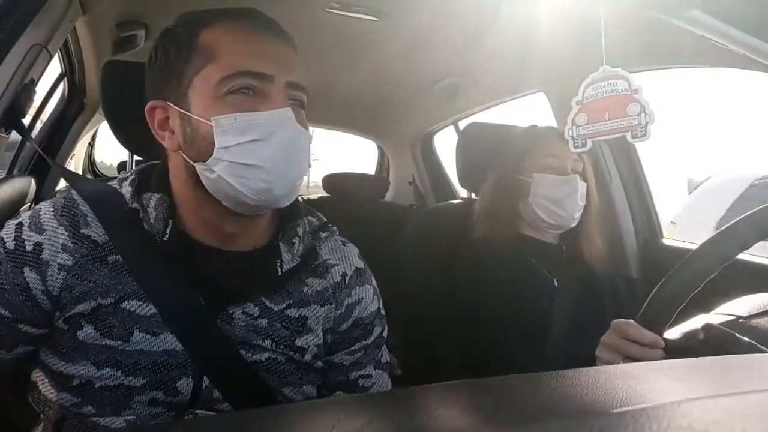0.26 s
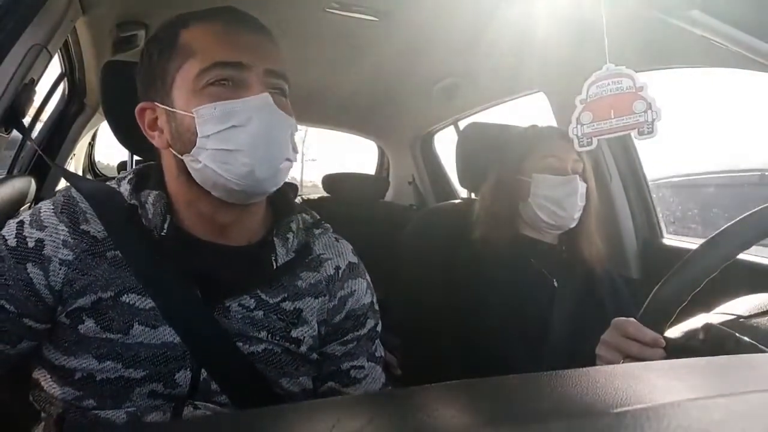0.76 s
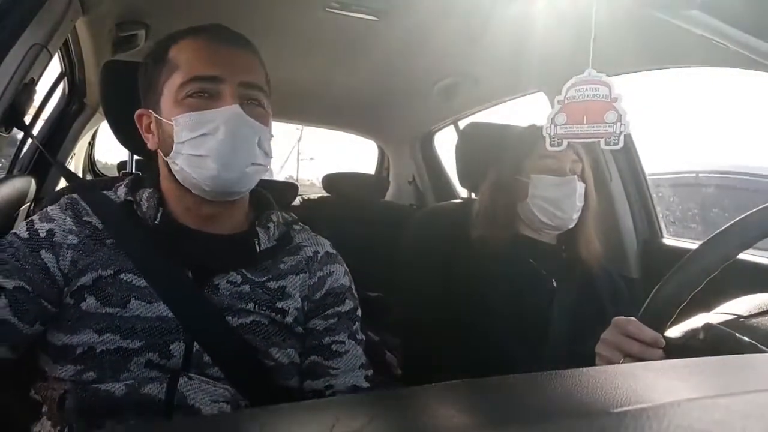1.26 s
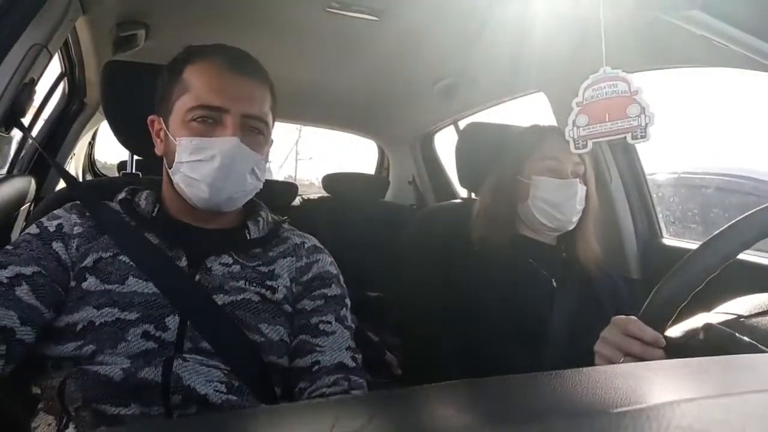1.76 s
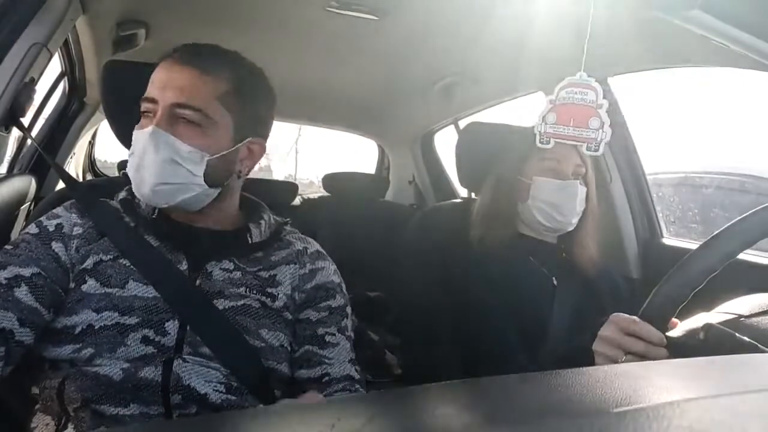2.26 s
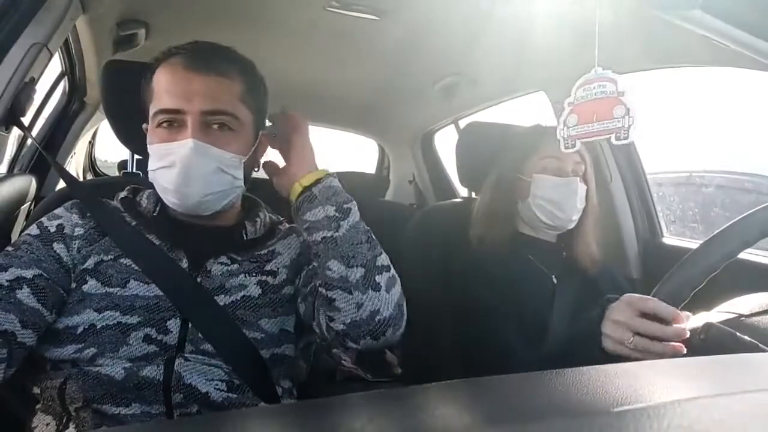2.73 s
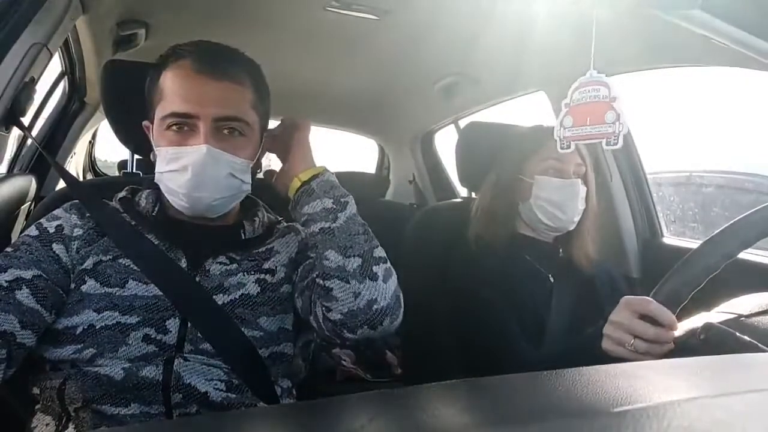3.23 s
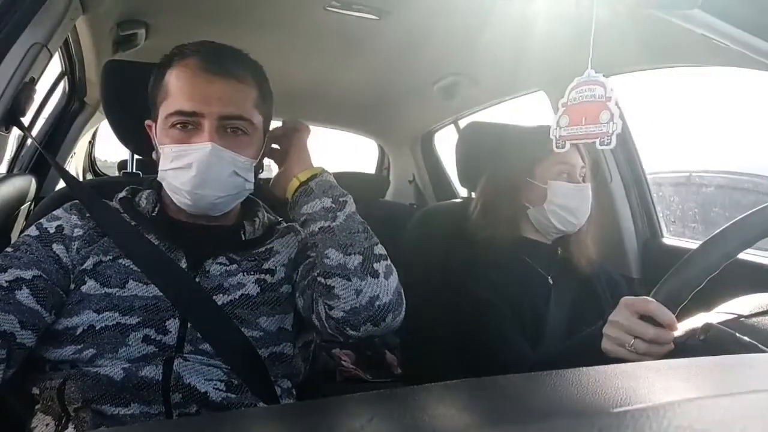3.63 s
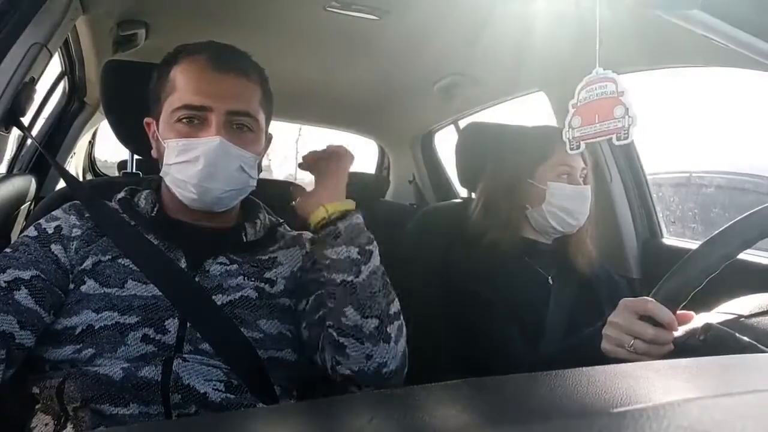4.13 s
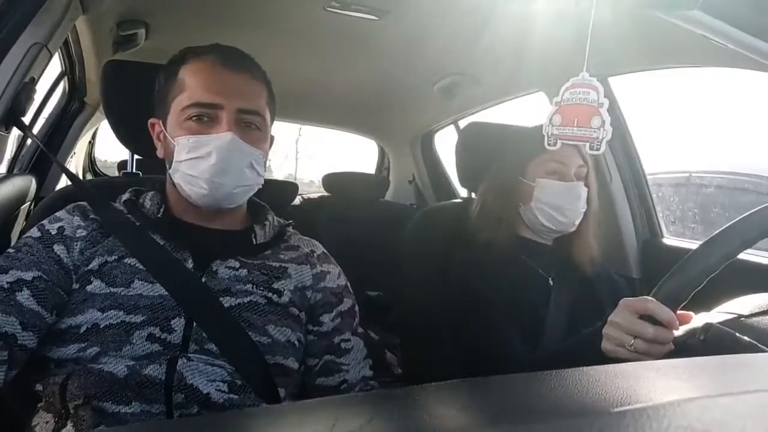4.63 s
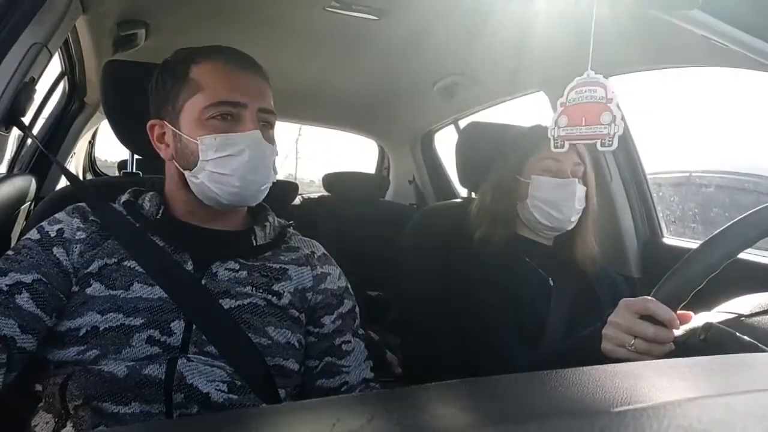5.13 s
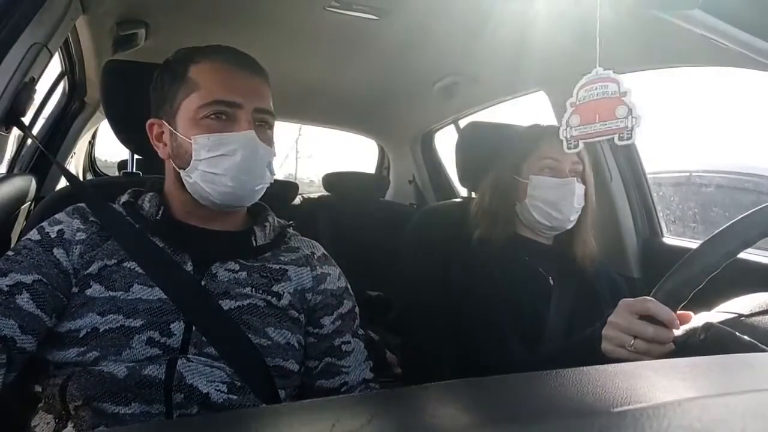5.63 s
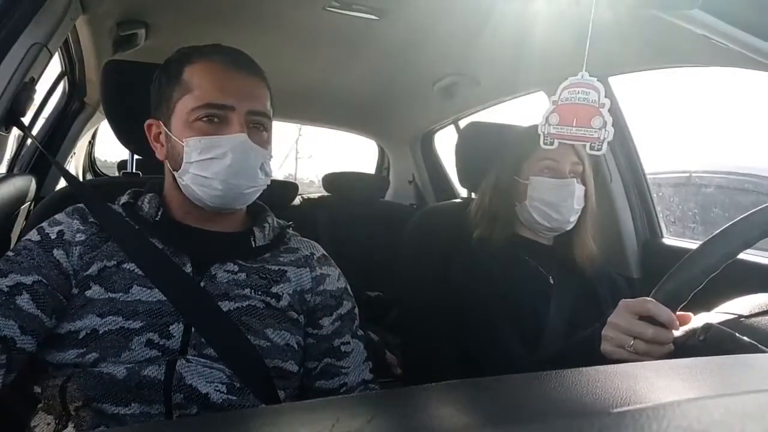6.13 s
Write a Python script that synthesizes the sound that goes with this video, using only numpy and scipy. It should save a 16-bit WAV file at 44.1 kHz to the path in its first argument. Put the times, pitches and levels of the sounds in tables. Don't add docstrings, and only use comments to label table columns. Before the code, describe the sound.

A low, boomy car interior in close stereo. The road rumble starts strongest and sinks in lumps over two seconds, ending in shudders, creaks and thin brake squeaks. Then a steady muffled idle drums the cabin with faint vent air. Cloth rubs near the microphone, followed by one tiny squeak, a small plastic click to the left and a short low lorry boom beyond the doors.

```python
import sys
import numpy as np
from scipy import signal
from scipy.fft import rfft, irfft, next_fast_len
from scipy.io import wavfile

SR = 44100
rng = np.random.default_rng(int(sys.argv[2]) if len(sys.argv) > 2 else 0)


def undo_db(level):
    steps = np.asarray(level, float) / 20
    return 10 ** steps


def put_to_file(sound):
    columns = np.atleast_2d(sound).T
    safe = np.clip(columns, -1, 1)
    whole_steps = np.round(safe * 32767)
    wavfile.write(sys.argv[1], SR, whole_steps.astype(np.int16))


N = 281799
TIME = np.arange(N) / SR


def rms_one(x):
    return x / np.sqrt(np.mean(x ** 2) + 1e-20)


def in_time(rows):
    s, value = np.transpose(rows)
    return np.interp(TIME, s, value)


def at_hz(points, hz):
    table_hz, value = np.transpose(points)
    return np.interp(np.log(hz + 1), np.log(table_hz + 1), value)


def drift(rate):
    r = np.exp(-80 * np.pi * rate / SR)
    slow = signal.lfilter([1], [1, -2 * r, r * r], rng.standard_normal(N // 40 + 4002))[4000:]
    return np.interp(np.arange(N) / 40, np.arange(len(slow)), rms_one(slow))


def swell(start_s, length_s, edge_s):
    half, end_s = edge_s / 2, start_s + length_s
    rise = np.interp(TIME, [start_s - half, start_s + half], [0, 1])
    fall = np.interp(TIME, [end_s - half, end_s + half], [1, 0])
    share = rise * fall
    return share * share * (3 - 2 * share)


def resonance(x, hz, width_hz):
    r = np.exp(-np.pi * width_hz / SR)
    poles = [1, -2 * r * np.cos(2 * np.pi * hz / SR), r * r]
    return signal.lfilter([(1 - r * r) / 2, 0, (r * r - 1) / 2], poles, x)


def ring(clicks, hz, t60_s):
    r, w = undo_db(-60 / (t60_s * SR)), 2 * np.pi * hz / SR
    return signal.lfilter([0, np.sin(w)], [1, -2 * r * np.cos(w), r * r], clicks + 1e-18)


def dull(x, hz):
    return signal.sosfilt(signal.butter(2, hz, fs=SR, output="sos"), x)


# pitch_hz, side_minus_mid_db
STEREO_WIDTH = [(200, -16), (330, -11.5), (390, -5.5), (450, -10.5), (600, -3), (690, 5.5), (820, 9),
                (950, 2.5), (1250, -1.5), (1700, 2), (2400, -2), (5800, 1.5), (6300, -9), (15000, -11)]
# pitch_hz, left_minus_right_db
LEFT_LEAN = [(60, 0.5), (110, 2.5), (200, 0.5), (380, 0.0), (700, 0), (1290, 2), (2380, 2), (4400, -1.5),
             (8120, 2), (15000, 0.0)]
# pitch_hz, share
QUARTER_LEAD = [(150, 0), (350, -.3), (650, -.1), (950, .3), (1350, .3), (1700, .1), (2250, .25), (3000, 0)]


def noise(spectrum, lo_hz=10, hi_hz=20000):
    size = next_fast_len(N)
    hz = np.fft.rfftfreq(size, 1 / SR)
    mid, side = rfft(rng.standard_normal((2, size))) * undo_db(at_hz(spectrum, hz))
    lead = np.clip(at_hz(QUARTER_LEAD, hz), -.9, .9)
    side = (np.sqrt(1 - lead ** 2) * side + 1j * lead * mid) * undo_db(at_hz(STEREO_WIDTH, hz))
    lean = undo_db(at_hz(LEFT_LEAN, hz) / 2)
    in_band = (hz > lo_hz) & (hz < hi_hz)
    scale = np.sqrt(2 * np.sum(np.abs(mid[in_band]) ** 2)) / size
    return irfft([(mid + side) * lean, (mid - side) / lean], size)[:, :N] / scale


# pitch_hz, level_db (per Hz)
FLOOR_BOOM = [(15, -50), (25, -51), (68, -2), (91, 3.5), (167, -1.5), (204, -18.5), (249, -3), (313, -26.5),
              (350, -43), (460, -45), (770, -120)]
# pitch_hz, level_db (per Hz)
TYRE_DRONE = [(88, -30), (150, 2), (205, -4), (304, -6), (352, -15), (411, -6.5), (586, -34), (663, -40.5),
              (1290, -36), (1800, -48), (2340, -65), (3960, -120)]
# start_s, speed_kmh
ROLLING_SPEED = [(0, 23.6), (.45, 16.1), (.75, 14.1), (1.05, 9), (1.5, 8.1), (2.1, 3.3), (2.4, 3)]
# start_s, length_s, boom_gain_db, drone_gain_db
BRAKING_SHUDDERS = [
    (0.371, .1, 6, 0.5),
    (1.425, 0.15, -4, 2),
    (1.688, 0.25, 7.5, 2.5),
    (2.04, 0.122, 13, 2.5),
    (2.167, .25, 13, 1.5),
]


def road():
    full_kmh, edge_s = 20, 0.025
    decades = np.log10(np.maximum(in_time(ROLLING_SPEED), .1) / full_kmh)
    boom_db = -29 + 37.5 * decades + 0.3 * drift(3.2)
    drone_db = -36 + 9.5 * decades + 0.91 * drift(21)
    for start_s, length_s, boom_gain_db, drone_gain_db in BRAKING_SHUDDERS:
        shudder = swell(start_s, length_s, edge_s)
        boom_db = boom_db + boom_gain_db * shudder
        drone_db = drone_db + drone_gain_db * shudder
    boom = undo_db(boom_db) * noise(FLOOR_BOOM, 50, 205)
    drone = undo_db(drone_db) * noise(TYRE_DRONE, 163, 410)
    stop = np.clip((2.4 - TIME) / 0.24, 0, 1)
    return stop * (boom + drone)


FIRING_HZ = 22.07
# start_s, level_db
ENGINE_LOAD = [(0, -8), (2.0, -9), (2.6, -1.5), (3.0, -0.5), (4.0, -2), (4.5, 0), (6.39, -1.5)]
# firing_multiple, level_db
ENGINE_ORDERS = [(1, -48), (2, -16), (3, -7.5), (4, -19), (5, -4), (6, 1), (7, -2), (8, -13), (9, -1.5),
                 (10, 2.5), (11, -19), (12, -7.5), (13, -1), (14, -4.5), (15, -21), (16, -12), (17, -10),
                 (18, -10), (19, -8.5), (20, -9.5), (21, -20), (22, -10.5), (23, -17.5), (24, -14.5)]
# firing_multiple, start_s, length_s, level_db
PANEL_SPELLS = [(4, 2.4, 1.9, -50.5), (4, 4.93, 0.62, -48), (5, 2.18, 1.93, -47.5), (5, 4.6, 1.9, -53),
                (6, 2.1, 1.14, -46), (6, 3.64, 0.985, -43.5), (6, 4.6, 1.9, -50.5), (9, 2.4, 0.5, -50),
                (9, 3.48, 1.08, -51.5), (10, 2.45, 1.2, -48), (10, 3.95, 0.41, -52), (10, 5.2, 1.3, -44.5)]


def engine_orders():
    others_db = -50.5 + .4 * in_time(ENGINE_LOAD)
    out_of_tune_db, edge_s = -57, 0.14
    strong_db = {}
    for k, start_s, length_s, db in PANEL_SPELLS:
        tuned_db = out_of_tune_db + (db - out_of_tune_db) * swell(start_s, length_s, edge_s)
        strong_db[round(k)] = np.maximum(strong_db.get(round(k), tuned_db), tuned_db)
    out = np.zeros((2, N))
    for k, order_db in ENGINE_ORDERS:
        level_db = strong_db.get(int(k), others_db + order_db + 1.56 * drift(0.86))
        wander = 0.25 * np.sqrt(k) * drift(0.62)
        phase = 2 * np.pi * k * FIRING_HZ * TIME + rng.uniform(0, 2 * np.pi) + wander
        skew = undo_db(at_hz(STEREO_WIDTH, k * FIRING_HZ)) * np.array([[-1], [1]])
        out += undo_db(level_db) * np.sqrt(2) * np.sin(phase + skew)
    return out


# pitch_hz, width_hz, level_db, delay_s, side_minus_mid_db
BLOCK_MODES = [(560, 90, 3.5, .010, -10), (719, 24, -3.5, .006, 9), (810, 59, -13, .004, 13),
               (902, 27, 4, 0.00079, -0.5), (970, 250, -6, 0.012, 4.5), (1213, 56, -7, 0.00049, -9),
               (1279, 47, -3, .008, -6.5), (1580, 32, -5.5, 0.00224, -3), (2306, 34, -9.5, 0.018, -11)]


def engine_knock():
    knock_db = -68.5 + in_time(ENGINE_LOAD)
    turns = FIRING_HZ * TIME
    out = np.zeros((2, N))
    for hz, width_hz, mode_db, delay_s, side_db in BLOCK_MODES:
        strength = undo_db(1.1 * rng.standard_normal(int(turns[-1]) + 3))
        late = turns + 1 + .19 - delay_s * FIRING_HZ
        since_s = (late % 1) / FIRING_HZ
        blow = since_s < 1 / SR
        rattle = (.035 * np.exp(-since_s / .009) + .008) * rng.standard_normal((2, N))
        push = strength[late.astype(int)] * (blow + rattle)
        mid, side = rms_one(dull(resonance(push, hz, width_hz), 2 * hz))
        side = undo_db(side_db) * np.roll(side, -round(SR / hz / 4))
        out += undo_db(knock_db + mode_db) * np.array([mid + side, mid - side])
    return out


# pitch_hz, level_db (per Hz)
CABIN_DRUMMING = [(20, -37), (40, -36.5), (65, -8.5), (95, -3), (180, -6.5), (240, -5.5), (310, -6),
                  (350, -10.5), (430, -9.5), (520, -13), (610, -15.5), (680, -28.5), (800, -34.5),
                  (1000, -65.5)]


def cabin():
    level_db = -51.5 + 2 * swell(-1.04, 3.2, 0.081) + 1.0 * drift(7.6)
    return undo_db(level_db) * noise(CABIN_DRUMMING, 444, 920)


# pitch_hz, level_db (per Hz)
VENT_AIR = [(500, -25.5), (700, -7.5), (900, 1.5), (1300, -1.5), (1500, -6), (1800, -9), (2300, -9.5),
            (2600, -16), (3400, -13), (4600, -16), (4900, -44)]


def blower():
    rush_db = 2.5 * swell(-1, 2.1, .8)
    return undo_db(-62.5 + rush_db + 0.97 * drift(6.6)) * noise(VENT_AIR)


# pitch_hz, level_db (per Hz)
MICROPHONE_HISS = [(4000, -40.5), (4700, 9), (6000, 3), (6200, 9.5), (7600, 4.5), (7750, -35), (8450, 9),
                   (8650, -16), (11300, -24), (11600, 6), (12800, 9.5), (13100, 11.5), (15700, 13),
                   (15780, -62)]


def microphone_hiss():
    return undo_db(-74.5 + .6 * drift(12)) * noise(MICROPHONE_HISS)


# pitch_hz, level_db (per Hz)
CLOTH_RUB = [(1200, -29), (2200, 0), (3300, 0.5), (4600, 2), (4900, -9), (6000, -8.5), (6300, 2.5),
             (7600, 1.5), (8450, -4.5), (8650, -12.5), (11300, -30.5), (11700, -8.5), (15700, -7.5),
             (15780, -54)]
# start_s, length_s, level_db
ARM_GESTURES = [
    (.45, 0.45, -79.5),
    (0.895, 0.76, -73.5),
    (2.002, 0.38, -77),
    (2.656, 0.25, -73.5),
    (2.952, 0.41, -71),
    (3.45, 0.51, -73.5),
    (4.2, .45, -77),
]
# start_s, level_db
CLOTH_FOLDS = [(0.02, -72), (1.07, -70.5), (2.2, -72.5), (2.51, -72), (2.91, -70), (3.04, -68.5),
               (3.22, -70), (3.245, -68), (3.27, -71), (3.35, -73), (3.59, -71), (3.65, -71), (4.07, -71),
               (4.37, -72.5), (4.47, -75), (5.18, -80)]


def sleeve():
    fold_s, edge_s = .03, 0.28
    power = undo_db(-78.5) ** 2
    for start_s, length_s, db in ARM_GESTURES:
        power = power + undo_db(db) ** 2 * swell(start_s, length_s, edge_s)
    for start_s, db in CLOTH_FOLDS:
        power = power + undo_db(db) ** 2 * swell(start_s - fold_s / 2, fold_s, fold_s)
    return np.sqrt(power) * undo_db(1.57 * drift(20)) * noise(CLOTH_RUB, 6200, 7580)


# start_s, peak_db, pitch_hz (of the thud)
BODY_CREAKS = [(.863, -29, 423), (1.107, -39.5, 560), (1.279, -27.5, 348), (1.399, -40, 500),
               (1.561, -26.5, 252), (1.664, -23.5, 316), (1.739, -24.5, 318), (1.827, -25.5, 230),
               (1.962, -23, 150), (2.054, -24, 360), (2.088, -32, 380), (2.115, -31.5, 340),
               (2.143, -34, 310), (2.21, -31.5, 305)]


def creaks():
    out = np.zeros((2, N))
    grit = noise([(300, 6), (600, -1), (1200, -2), (1800, -31), (4000, -38), (9000, -75)])
    for start_s, peak_db, hz in BODY_CREAKS:
        since_s = np.maximum(TIME - start_s, 0)
        thud = (1 - np.exp(-since_s / 0.00098)) * np.exp(-since_s / 0.0069)
        out += undo_db(peak_db + 3) * thud * np.sin(2 * np.pi * hz * since_s)
        burst = (1 - np.exp(-since_s / .001)) * np.exp(-since_s / .006)
        out += undo_db(peak_db - 21) * burst * grit
    return out


# start_s, length_s, level_db
PAD_GRIPS = [
    (1.305, .035, -68.5),
    (1.38, .05, -79),
    (1.43, 0.037, -60),
    (1.487, .078, -62.5),
    (1.57, .075, -67),
    (1.671, 0.053, -65),
    (1.736, .135, -59),
    (1.877, 0.075, -57),
    (1.957, 0.037, -63),
    (2.0, .045, -79),
]


def brake():
    edge_s, sag_db_per_s = 0.026, 32
    grip = np.zeros(N)
    for start_s, length_s, db in PAD_GRIPS:
        sag_db = sag_db_per_s * np.clip(TIME - start_s, 0, length_s)
        grip += swell(start_s, length_s, edge_s) * undo_db(db - sag_db)
    grip = np.maximum(grip, undo_db(-75) * swell(1.36, .27, edge_s))
    disc_hz = 7497 + 110 * np.maximum(TIME - 1.72, 0) + 7.7 * drift(40)
    phase = 2 * np.pi * np.cumsum(disc_hz) / SR
    skew = .25 * drift(5)
    return np.sqrt(2) * grip * undo_db(1.2 * drift(30)) * np.sin([phase + skew, phase - skew])


def seam_squeak():
    return undo_db(-65) * swell(3.215, .035, .015) * np.sin(2 * np.pi * 2235 * TIME)


# start_s, peak_db
TRIM_CLICKS = [
    (4.0615, -41),
    (4.0631, -44),
    (4.0651, -38),
    (4.0685, -55),
]
# pitch_hz, level_db, t60_s
TRIM_MODES = [(1130, -14, .03), (1310, 1.5, 0.042), (1600, -5, .012), (1850, -4, .012), (2120, -1.5, 0.023),
              (2450, -6, .025), (2880, -3, 0.015), (3230, -19, .02), (4400, -16, .01), (6700, -11, .015)]


def tick():
    clicks = np.zeros(N)
    for start_s, peak_db in TRIM_CLICKS:
        clicks[round(start_s * SR)] = undo_db(peak_db - 5)
    rung = 4.0 * resonance(clicks, 2600, 2500)
    for hz, mode_db, t60_s in TRIM_MODES:
        rung = rung + undo_db(mode_db) * ring(clicks, hz, t60_s)
    rung = dull(rung, 5000)
    return np.array([rung * undo_db(1.5), np.roll(rung, shift=4) * undo_db(-5.0)])


def lorry():
    nearest_s, approach_s, recede_s = 4.9, 0.12, 0.11
    away = (TIME - nearest_s) / np.where(TIME < nearest_s, approach_s, recede_s)
    rumble = noise([(60, -17.0), (90, -7.0), (110, 2.5), (150, -19.0), (300, -62.0)])
    return undo_db(-38.5) / (1 + away ** 2) * rms_one(resonance(rumble, 94.3, 18))


def scene():
    moving = road() + engine_orders() + engine_knock()
    steady = cabin() + blower() + microphone_hiss()
    return moving + steady + sleeve() + creaks() + brake() + seam_squeak() + tick() + lorry()


def top_cut(x):
    return signal.sosfilt(signal.butter(12, 15750, fs=SR, output="sos"), x)


def record(dry):
    band = signal.butter(6, [8650, 10600], "band", fs=SR, output="sos")
    faint = signal.sosfiltfilt(band, dry)
    braking = np.clip(np.minimum(TIME - 1.4, 1.98 - TIME) / .02, 0, 1)
    thinning = braking * np.clip(1.2 + .5 * drift(12), 0, 1)
    opening = np.clip(TIME / 0.0018, 0, 1)
    return top_cut((dry - thinning * faint) * opening)


dry = scene()
out = record(dry)
put_to_file(out)
```